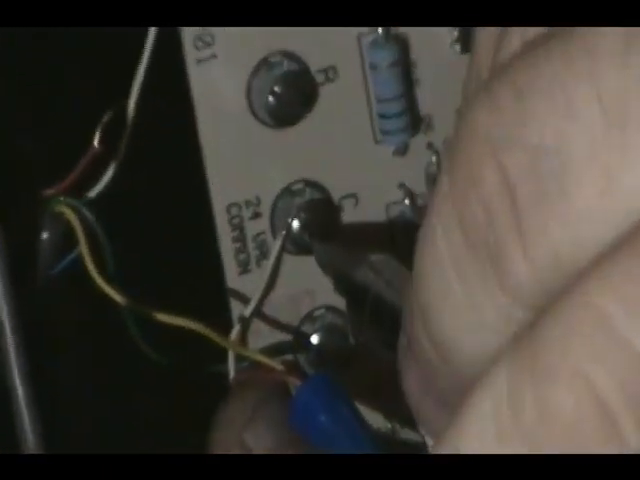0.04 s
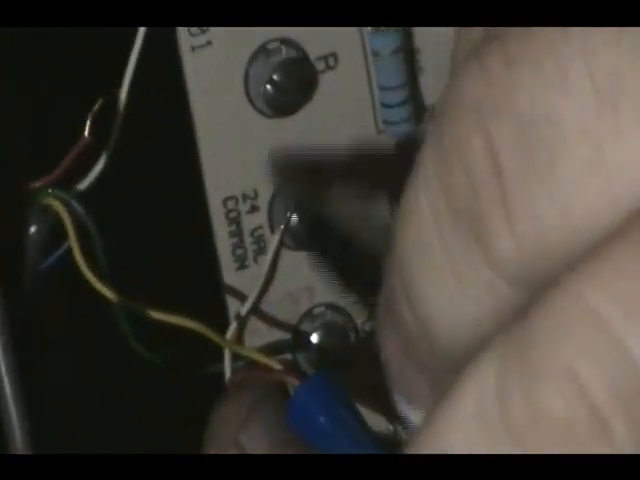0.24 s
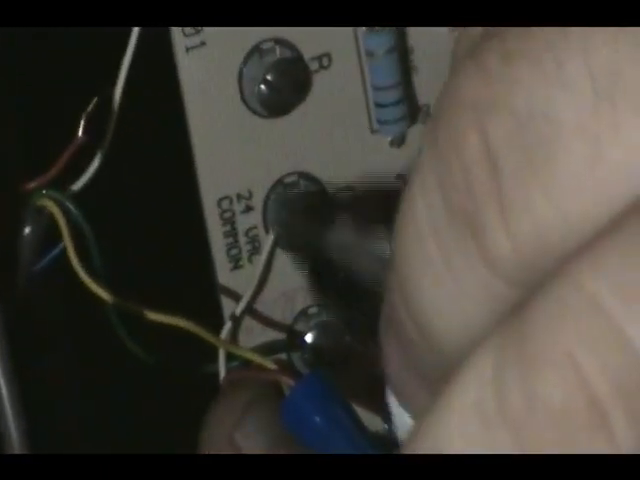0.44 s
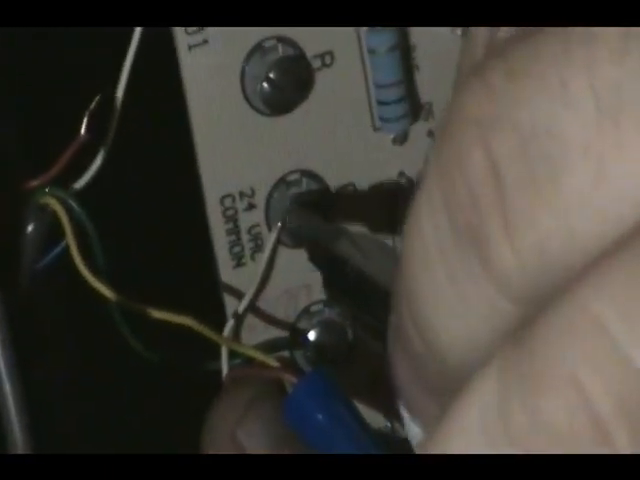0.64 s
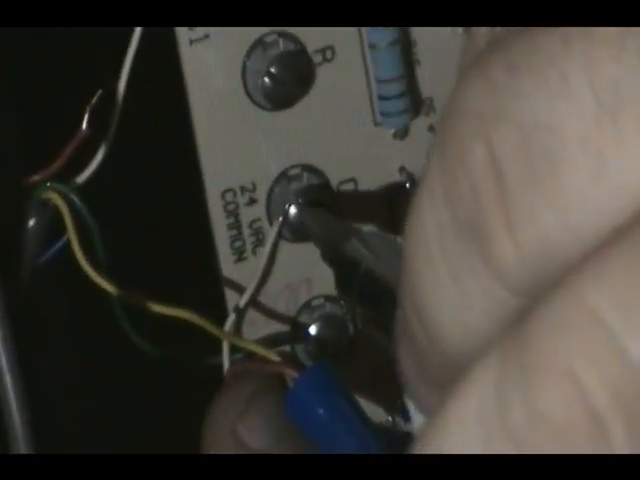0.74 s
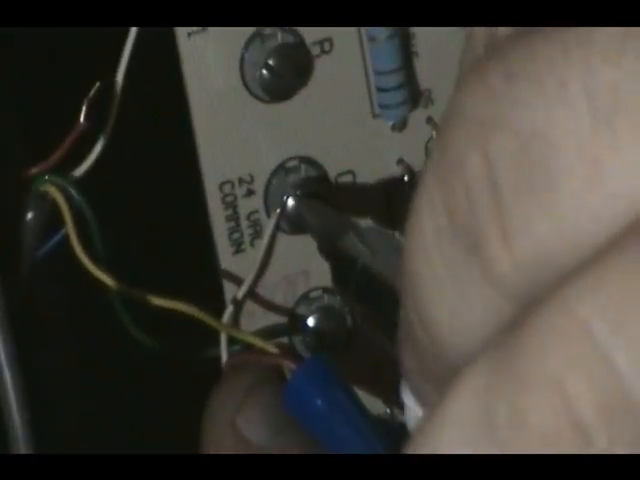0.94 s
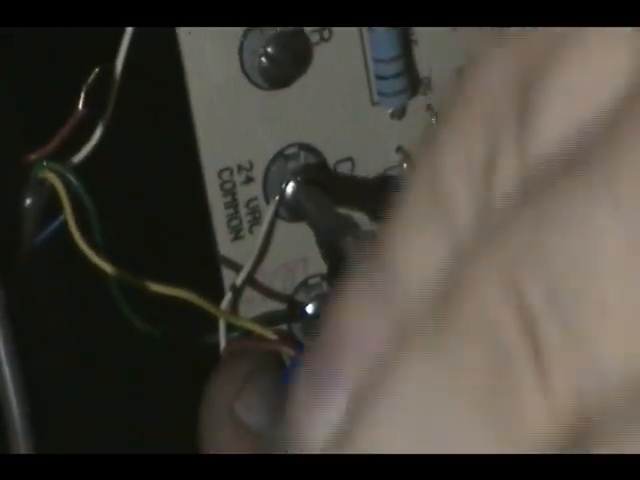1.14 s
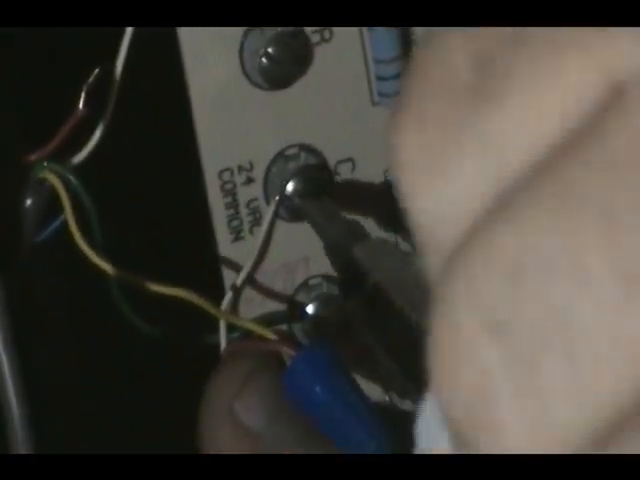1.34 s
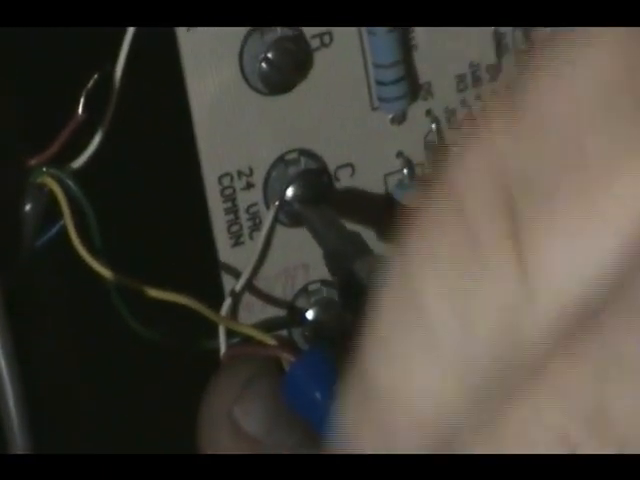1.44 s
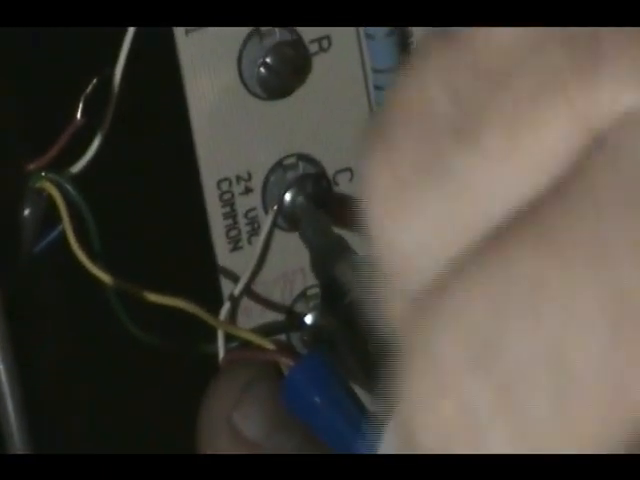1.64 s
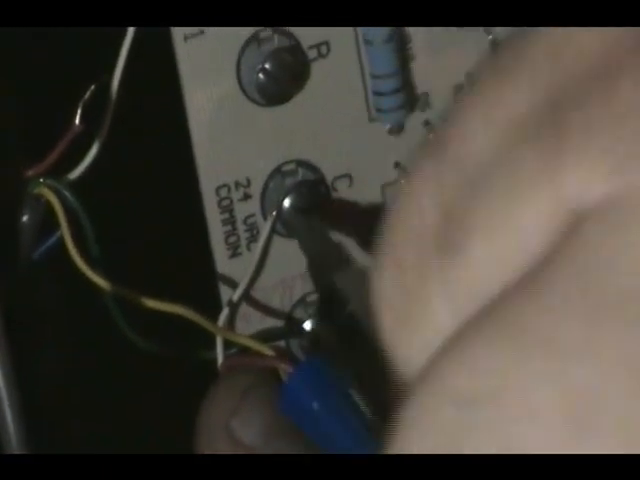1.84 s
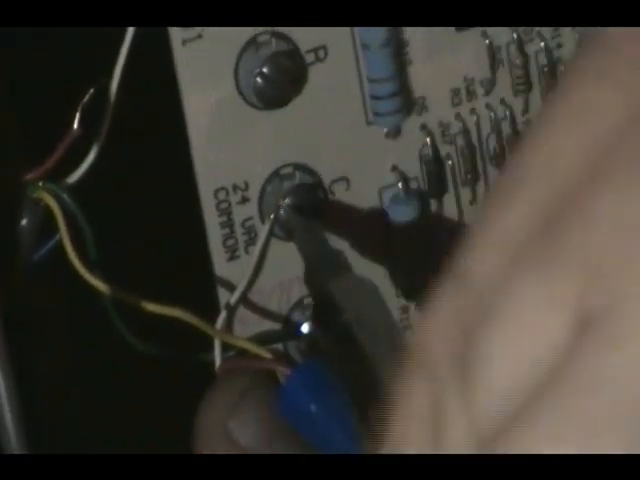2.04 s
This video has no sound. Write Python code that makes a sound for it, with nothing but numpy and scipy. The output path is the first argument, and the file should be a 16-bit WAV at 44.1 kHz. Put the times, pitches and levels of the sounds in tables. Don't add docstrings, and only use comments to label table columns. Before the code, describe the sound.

Close-up handling of small screws and wires on a circuit board; sharp clicks and scrapes crowd the first second, then quiet dull taps and rubs, over low indoor rumble, soft hiss and a faint high whine.

```python
import sys
import numpy as np
from scipy import signal
from scipy.fft import rfft, irfft, next_fast_len
from scipy.io import wavfile
from scipy.ndimage import uniform_filter1d, map_coordinates

SR = 44100
rng = np.random.default_rng(int(sys.argv[2]) if len(sys.argv) > 2 else 0)


def decibels_to_gain(level_db):
    exponent = np.asarray(level_db, float) / 20
    return 10 ** exponent


def dump(signal):
    limited = np.clip(np.atleast_2d(signal).T, -1, 1)
    pcm = np.round(limited * 32767).astype(np.int16)
    wavfile.write(sys.argv[1], SR, pcm)


N = 92610


def contacts():
    # (time [s], peak level [dB], bass [dB], treble [dB], air [dB])
    knocks = [(.2665, -34.5, 4.5, 3.5, -5.5), (0.2722, -32, -7, 6, -8), (0.3696, -23, -2, 1, -15),
              (.384, -36.5, 4.5, -17, -25), (0.4127, -22, -11.5, -2, -19),
              (0.4767, -23.5, -20, -5.5, -10.5), (.489, -24.5, -16, -5.5, -11.5),
              (0.5267, -27.5, -10.5, -2.5, -8), (0.6459, -27, -3.5, 4.5, -8),
              (0.787, -30.5, -24.5, -11, -16), (0.95, -55.5, 8, -15, -25), (0.99, -49.5, -16, -0.5, -15),
              (1.156, -51, 8, -22, -25), (1.296, -41, -3.5, -1.5, -15), (1.354, -36.5, -4, -10.5, -18),
              (1.379, -43, 4.5, 0.5, -15), (1.545, -53, 5, -20, -20), (1.612, -42.5, 3, -3, -12),
              (1.874, -43.5, -26, -14, -13), (2.03, -51, 2, -25, -22), (1.892, -44.5, -5.5, -3.5, -6.5),
              (1.49, -64, 11, -15, -22)]
    # (time [s], peak level [dB], bass [dB], treble [dB], rise [s])
    slips = [(.256, -33.5, -3, -12, 0.0051), (.275, -25.5, -22, -10.5, 0.0048),
             (0.401, -33, -17, -2.5, 0.0089), (.495, -37, -8.5, -21, 0.0069), (0.531, -36, -1, -32, 0.0026),
             (.695, -40.5, -6, -6, .012), (.715, -41.5, 1, -9.5, 0.011), (0.736, -45, -3, -5.5, .008),
             (.81, -42.5, 1, -7.5, 0.01), (.828, -52, -5, -25, 0.0027), (0.839, -49.5, 10.5, -32, 0.0027),
             (0.969, -46, 2, -15, 0.012), (.995, -52, -3, -28, 0.0043), (1.03, -46, -17, -19, 0.0064),
             (1.046, -49, 6.5, -5, 0.0042), (1.299, -42, 8, -8.5, 0.0068), (1.395, -59, 16, -9, 0.0065),
             (1.424, -52, 4, -9, .005), (1.861, -49, 4.5, -2.5, 0.0098), (1.616, -50, -1, -5, 0.007),
             (1.643, -67, 11, -18, 0.0045), (1.885, -66, 16, 5, 0.0045), (1.919, -43, 2, -7.5, 0.0091),
             (1.901, -50, 10, -3, 0.0048)]
    # (frequency [Hz], width [Hz], level [dB])
    free_board = [(257, 39, -21), (507, 40, -1.5), (715, 110, -3.5), (1226, 70, 2), (1610, 143, -2.5),
                  (1853, 40, -1), (2326, 140, -7.5), (2572, 83, 4), (2924, 240, 0), (3316, 54, 0),
                  (3670, 230, -15), (5950, 67, -30), (6910, 100, -21)]
    # (frequency [Hz], width [Hz], level [dB])
    held_board = [(269.4, 40, -1.5), (577, 86, 0.5), (944, 34, -1), (1236, 110, 3), (1607, 80, -6.5),
                  (2255, 33, -17.5), (2715, 120, -8), (3220, 160, -20.5)]
    # (frequency [Hz], level [dB])
    rattle = [(150, -22), (350, -23.5), (550, 2.5), (1300, -10.5), (3200, 0.5), (6000, -12), (11000, -17),
              (15000, -26.5)]
    # (low edge [Hz], high edge [Hz])
    bands = [
        (220, 850),
        (900, 2400),
        (2400, 4800),
        (6000, 13000),
    ]
    knock_rise_s, fall_s, hand_on_s = 0.00073, 0.0034, 0.9
    slip_air_db = -9
    grit_db, rattle_db, cabinet_db, trim_db = 4, -9, -2, -4.5

    out = np.zeros((2, N))
    t = np.arange(SR // 3) / SR
    rows = [(*row, knock_rise_s) for row in knocks]
    rows += [(s, db, bass, treble, treble + slip_air_db, rise) for s, db, bass, treble, rise in slips]
    for s, db, bass_db, treble_db, air_db, rise in rows:
        decay = np.exp(-(t - rise) / (fall_s + rise))
        shape = np.where(t < rise, (t / rise) ** 2, decay)
        grit = unit(uniform_filter1d(rng.standard_normal(t.size), size=24))
        push = shape * rng.standard_normal(t.size) * decibels_to_gain(grit_db * grit)

        modes = free_board if s < hand_on_s else held_board
        x = filtered(push, lambda f: resonances(f, modes, 2, 1.065) + causal(rattle_db + along(rattle, f)))
        x = x + decibels_to_gain(cabinet_db) * cabinet(x)

        bass, middle, treble, air = (peak_db(x, *band) for band in bands)
        treble_gain = treble_db - treble
        colour = [(750, bass_db - bass), (1050, -middle), (2100, -middle),
                  (2700, treble_gain), (3800, treble_gain), (7000, air_db - air)]
        x = filtered(x, lambda f: causal(along(colour, f)))
        add(out, s, decibels_to_gain(db + trim_db) * pair(x))
    return out


def tick():
    # (time [s], peak level [dB])
    blows = [
        (0.2337, -13),
    ]
    # (frequency [Hz], width [Hz], level [dB])
    blade = [(600, 120, -9), (1390, 500, -4), (2650, 550, 1.5), (4600, 330, -0.5), (6600, 680, -5.5),
             (8220, 490, -9.5), (11400, 3400, -18.5), (14600, 1300, -31)]
    contact_s, grit_db, tail_db, trim_db = 0.0008, -18.5, -29, -3

    out = np.zeros((2, N))
    t = np.arange(SR // 10) / SR
    for s, db in blows:
        swell = t / contact_s * np.exp(1 - t / contact_s)
        blow = decibels_to_gain(grit_db) * rng.standard_normal(t.size) * swell
        blow[round(SR * contact_s)] += 1
        x = filtered(blow, lambda f: resonances(f, blade, 0, 0.64))
        x = x + decibels_to_gain(tail_db) * cabinet(x)
        add(out, s - 0.001, pair(x) * decibels_to_gain(db + trim_db) / np.abs(x).max())
    return out


def resonances(f, peaks, scatter_db, widen):
    luck = rng.standard_normal(len(peaks))
    total = 0
    for k, (centre, width, db) in enumerate(peaks):
        damping = 1j * f * max(width * widen, 55)
        gain = (-1) ** k * decibels_to_gain(db + scatter_db * luck[k])
        total = total + gain * damping / (centre * centre - f * f + damping)
    return total


def cabinet(x):
    # (frequency [Hz], time to fall 60 dB [s])
    decay_times = [(250, 0.49), (600, 0.19), (1500, 0.21), (3500, 0.15), (9000, 0.22)]
    hz, t, z = signal.stft(rng.standard_normal(x.size), SR, nperseg=128)
    fall = decibels_to_gain(-60 * t / along(decay_times, hz)[:, None])
    tail = signal.istft(z * fall, SR, nperseg=128)[1]
    return signal.fftconvolve(x, tail / np.linalg.norm(tail))[:x.size]


def pair(x):
    # (frequency [Hz], level [dB])
    difference = [(300, -13), (700, -26.5), (2500, -14.5), (6000, -6), (12000, -3.5)]
    t = np.arange(SR // 20) / SR
    echo = rng.standard_normal(t.size) * np.exp(-t / 0.005)
    side = signal.fftconvolve(x, echo / np.linalg.norm(echo))[:x.size]
    side = filtered(side, lambda f: causal(along(difference, f)))
    return np.array([x + side, x - side])


def background():
    # (frequency [Hz], density [dB per Hz])
    room_spectrum = [(15, -52), (25, -8), (119, 4), (312, -0.5), (546, 3.5), (991, -9), (1350, -5.5),
                     (1600, -24), (2500, -26), (3250, -29), (5500, -120)]
    # (frequency [Hz], density [dB per Hz])
    hiss_spectrum = [(300, 5), (2000, 3), (5000, 1), (10000, 0), (14500, 1)]
    # (frequency [Hz], rms level [dB])
    steady_tones = [
        (59.5, -67),
        (119, -80),
        (7881, -72),
    ]
    waver = [0.56, 0.86, 0.34]
    room_db, room_side_db, room_left_db = -61, -27, 1.1
    hiss_db, hiss_left_db = -60, 0.24

    spectrum = [(15, -40)] + room_spectrum + [(4000, -57)]
    mid, side = filtered(rng.standard_normal((2, N)), lambda f: decibels_to_gain(along(spectrum, f)))
    mid = unit(mid) * decibels_to_gain(0.43 * wobble(3.24))
    side = unit(side) * decibels_to_gain(room_side_db)
    room = decibels_to_gain(room_db) * np.array([mid + side, mid - side]) * decibels_to_gain([[room_left_db], [-room_left_db]])

    hiss = unit(filtered(rng.standard_normal((2, N)), lambda f: decibels_to_gain(along(hiss_spectrum, f))))
    hiss = decibels_to_gain(hiss_db) * hiss * decibels_to_gain([[hiss_left_db], [-hiss_left_db]])

    t = np.arange(N) / SR
    tones = np.zeros(N)
    for (hz, db), depth in zip(steady_tones, waver):
        phase = 2 * np.pi * hz * t + depth * wobble(44.4)
        tones += decibels_to_gain(db - 2) * np.sin(phase) * (1 + depth * wobble(25.7) / 2)
    return room + hiss + tones


def wobble(rate):
    return map_coordinates(rng.standard_normal(N // 100), [np.arange(N) * rate / SR])


def unit(x):
    return x / np.sqrt(np.mean(x ** 2) + 1e-20)


def along(points, hz):
    f, v = np.transpose(points)
    return np.interp(np.log(hz + 1), np.log(f + 1), v)


def filtered(x, response):
    m = next_fast_len(x.shape[-1] + 4096)
    spectrum = rfft(x, m) * response(np.fft.rfftfreq(m, 1 / SR))
    return irfft(spectrum, m)[..., :x.shape[-1]]


def causal(db):
    c = irfft(np.log(decibels_to_gain(db)))
    c[1:len(c) // 2] *= 2
    c[len(c) // 2 + 1:] = 0
    return np.exp(rfft(c))


def peak_db(x, lo, hi):
    band = filtered(x, lambda f: (f > lo) & (f < hi))
    return 10 * np.log10(uniform_filter1d(band ** 2, size=256).max() * 2)


def add(out, s, x):
    at = out[:, round(s * SR):][:, :x.shape[-1]]
    at += x[:, :at.shape[1]]


def starve(x):
    # (frequency [Hz], depth [dB])
    lost_under = [(8500, 60), (10000, 22), (12500, 33.5), (15000, 24)]
    scatter_db = 7.5
    hz, t, z = signal.stft(x, SR, nperseg=1024, noverlap=768)
    power = np.mean(np.abs(z) ** 2, axis=0)
    whole = uniform_filter1d(power.sum(axis=0), size=5)
    band = uniform_filter1d(power, size=12, axis=0)
    band = uniform_filter1d(band, size=3, axis=1) * 12
    luck = rng.standard_normal((hz.size // 12 + 1, t.size // 4 + 1))
    luck = luck.repeat(12, 0).repeat(4, 1)[:hz.size, :t.size]
    under_db = 10 * np.log10(np.abs(whole) / np.abs(band + 1e-20) + 1e-20) + scatter_db * luck
    kept = z * (under_db < along(lost_under, hz)[:, None])
    return signal.istft(kept, SR, nperseg=1024, noverlap=768)[1][:, :N]


def scene():
    left_db = 0.3
    return (tick() + contacts()) * decibels_to_gain([[left_db], [-left_db]]) + background()


def low_pass(x):
    return signal.sosfilt(signal.butter(12, 15920, fs=SR, output="sos"), x)


def record(dry):
    limited = filtered(dry, lambda f: f < 15080)
    mix = starve(limited)
    return low_pass(mix)


dry = scene()
out = record(dry)
dump(out)
```